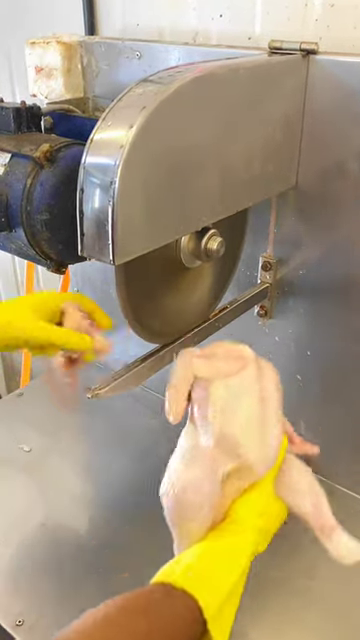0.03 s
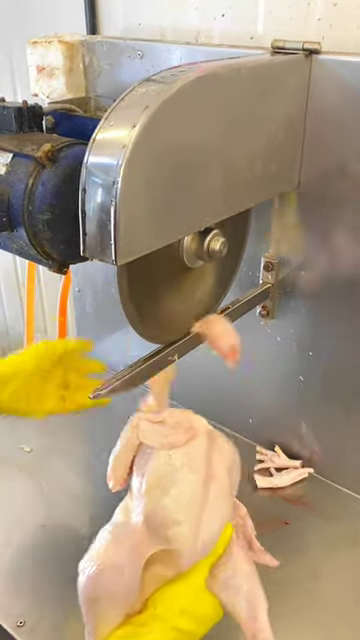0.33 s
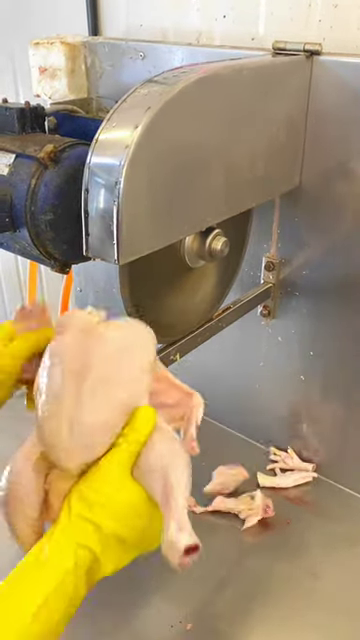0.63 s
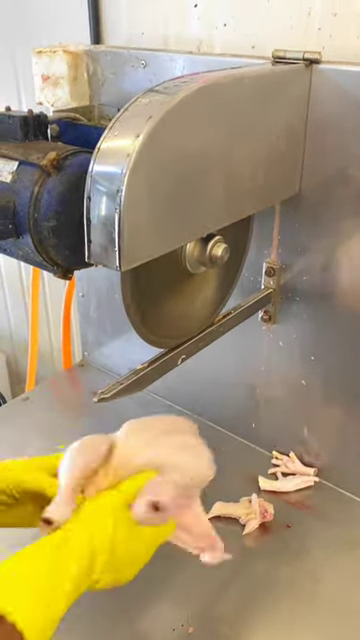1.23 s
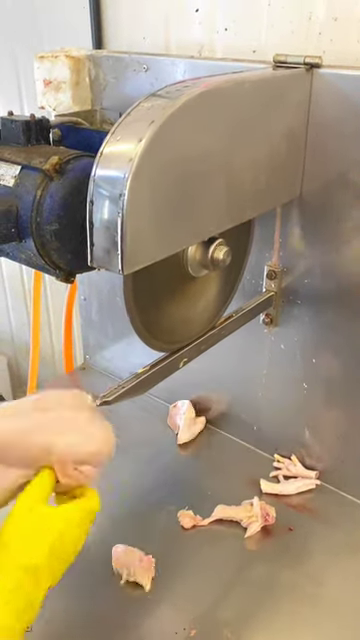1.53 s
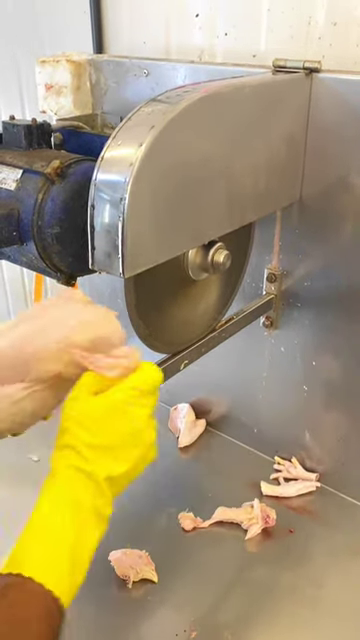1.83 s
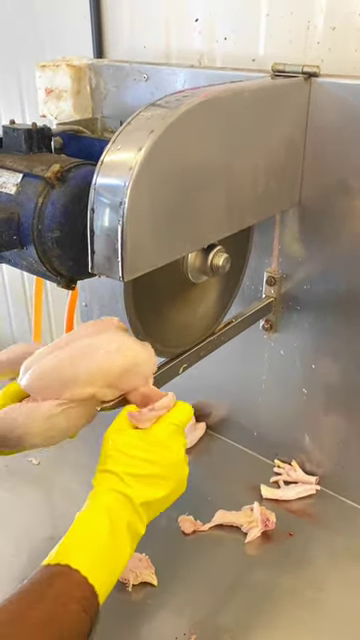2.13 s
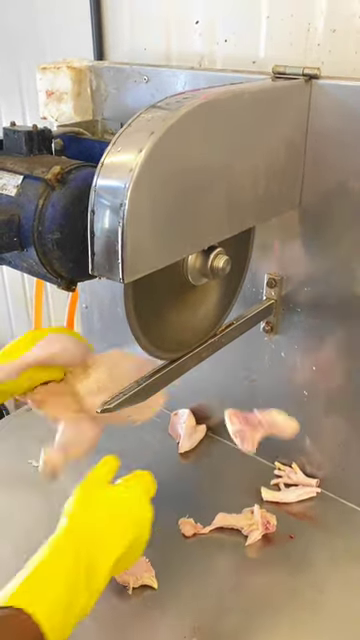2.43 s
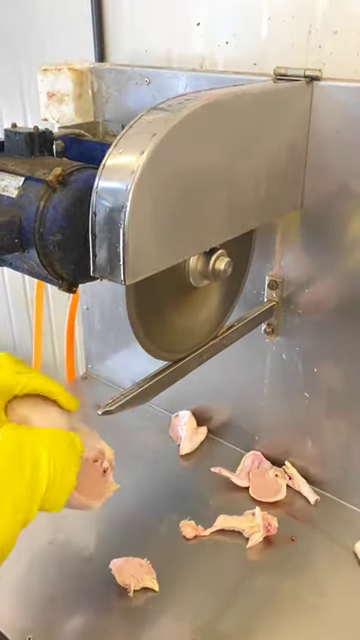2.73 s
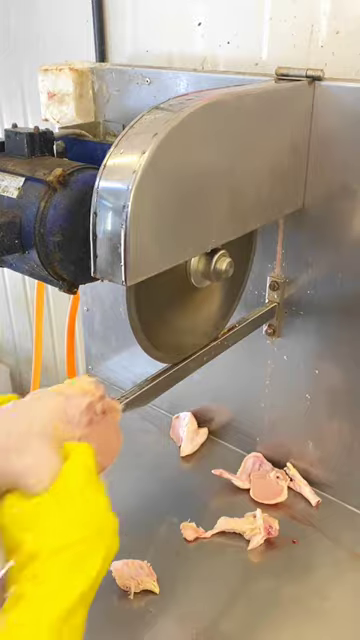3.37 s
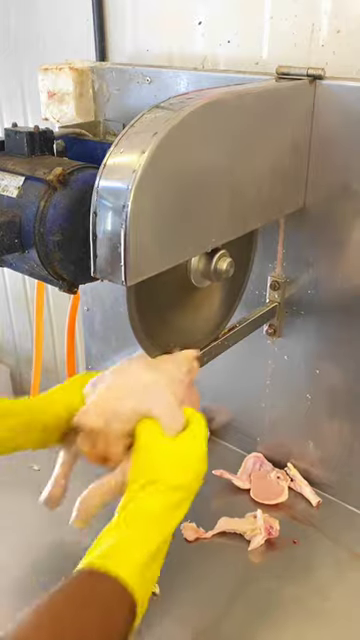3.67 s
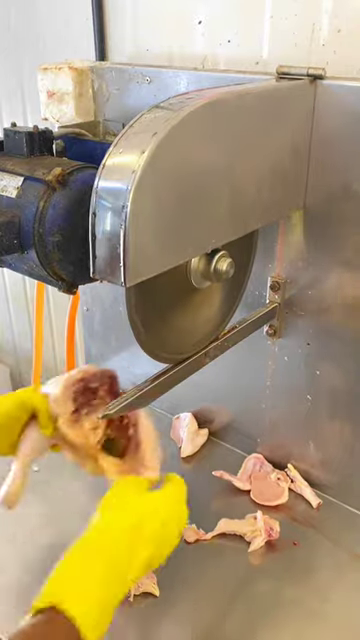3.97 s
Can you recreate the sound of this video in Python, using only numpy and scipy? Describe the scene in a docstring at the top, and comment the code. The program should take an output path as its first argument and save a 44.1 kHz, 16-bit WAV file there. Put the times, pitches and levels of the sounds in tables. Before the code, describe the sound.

A circular blade runs close by in a small hard room, its motor humming and steel guard rattling throughout. It hisses through chicken and rasps, crunches and rings on bone at about 0.3, 1 and 2.2 seconds, then three times between 3.5 and 3.8, groaning faintly after each cut. Meat slaps onto a booming metal table around 0.3 to 0.7, 1.3, 2.5 to 2.7 and 4 seconds.

```python
"""A small hard room, about a metre from a circular blade running in a steel guard over a sheet-metal table.
The motor hums, the guard rattles, the frame rumbles, bearings and cooling air rush.
Poultry is pushed into the blade, which hisses through flesh and rasps, crunches and rings on bone.
After each bone cut the machine runs briefly quieter and the motor groans faintly.
Pieces of meat slap on the table and set it booming."""
import sys
import numpy as np
from scipy import signal
from scipy.fft import rfft, irfft
from scipy.io import wavfile
from scipy.ndimage import uniform_filter1d

SR = 44100
rng = np.random.default_rng(int(sys.argv[2]) if len(sys.argv) > 2 else 0)


def wav_out(sig):
    """Save sig, one row per channel (or a flat mono array), as 16-bit PCM at SR to the path in sys.argv[1]."""
    wavfile.write(sys.argv[1], SR, np.round(np.clip(np.atleast_2d(sig).T, -1, 1) * 32767).astype(np.int16))


N = 176400
TIME_S = np.arange(N) / SR
FREQ_HZ = np.arange(N // 2 + 1) * SR / N
LN_1000 = np.log(1000)  # 60 dB of decay


def undb(db):
    """Decibels to gain."""
    return 10 ** (np.asarray(db) / 20)


def unit(x):
    """Scale to rms 1."""
    return x / np.sqrt(np.mean(x ** 2))


def bell(offset, width):
    """Gaussian bump, peak 1."""
    return np.exp(-(offset / width) ** 2)


def colour(x, curve):
    """Filter by a curve of freq_hz, gain_db points."""
    freq_hz, gain_db = np.array(curve, float).T
    gain = undb(np.interp(np.log(np.maximum(FREQ_HZ, 1)), np.log(freq_hz), gain_db))
    return irfft(rfft(x) * gain, N)


def noise():
    """Two independent white noises."""
    return rng.standard_normal((2, N))


def walk(rate_hz):
    """Smooth random wander, rms 1."""
    size = max(int(SR / rate_hz), 2)
    steps = rng.standard_normal(2048)[np.arange(N) // size % 2048]
    return unit(uniform_filter1d(uniform_filter1d(steps, size), size))


def clicks(per_s, spread_db):
    """Random clicks of uneven size on two paths, rms 1."""
    size = undb(spread_db * np.minimum(rng.exponential(size=N), 5))
    return unit((rng.random(N) < per_s / SR) * size * noise())


def ring(x, pitch_hz, t60_s):
    """One decaying mode; keeps the power of white noise."""
    radius = np.exp(-LN_1000 / (t60_s * SR))
    pole = radius * np.exp(2j * np.pi * pitch_hz / SR)
    return signal.lfilter([np.sqrt(2 * (1 - radius ** 2))], [1, -pole], x).imag


def swell(start_s, attack_s, hold_s, release_s):
    """Exponential rise to 1 at start_s, hold, exponential fall."""
    age_s = TIME_S - start_s
    log_gain = np.minimum(age_s, 0) / attack_s - np.maximum(age_s - hold_s, 0) / release_s
    return np.exp(np.maximum(log_gain, -30))


def reflect(x, envelope, level_db):
    """Add dense echoes that follow an envelope."""
    echoes = rng.standard_normal((2, len(envelope))) * envelope
    echoes /= np.sqrt(np.sum(echoes ** 2) / 2)
    return x + undb(level_db) * signal.fftconvolve(x, echoes, axes=1)[:, :N]


# Stereo width: freq_hz, side_gain_db
STEREO_WIDTH = [(60, -46), (200, -21), (380, -14.5), (700, -1.5), (1300, -4), (2400, -0.5), (4400, 0),
                (8000, 1)]
def spread(pair):
    """Mid and side to stereo at rms 1: narrow bass, wide treble."""
    side = colour(pair[1], STEREO_WIDTH)
    return unit(np.array([pair[0] + side, pair[0] - side]))


WAVER_DB, WAVER_RATE_HZ, DRIFT_HZ = 4.6, 20, 3
# Motor and frame tones: pitch_hz, level_db
HUM_TONES = [(98, -37.5), (199.5, -37.5), (258.5, -35.5), (400.5, -46), (506.5, -49.5), (602, -62),
             (850.5, -51), (1319.5, -51.5), (1779, -49.5)]
def motor_hum():
    """Motor and frame hum, each tone wavering in pitch and level."""
    tones = 0
    for pitch_hz, level_db in HUM_TONES:
        cycles = np.cumsum(pitch_hz + DRIFT_HZ * walk(8)) / SR + rng.random((2, 1))
        gain = np.sqrt(2) * undb(level_db + WAVER_DB * walk(WAVER_RATE_HZ))
        tones += gain * np.sin(2 * np.pi * cycles)
    return spread(tones) * np.std(tones[0])


# Guard resonances: pitch_hz, bandwidth_hz, level_db
GUARD_MODES = [(848, 10, -58), (1377, 24, -42), (1562, 35, -40), (1722, 26, -49.5), (1790, 38, -39),
               (1872, 35, -43.5), (2816, 33, -50.5), (4240, 60, -47.5), (4730, 130, -57), (8920, 440, -55)]
def guard_rattle(trim_db=-2, flutter_db=-1.5):
    """Rapid knocks ring the steel guard."""
    knocks = clicks(per_s=900, spread_db=-4) * undb(flutter_db * walk(23.59))
    modes = 0
    for pitch_hz, bandwidth_hz, level_db in GUARD_MODES:
        t60_s = LN_1000 / (np.pi * bandwidth_hz)
        modes += undb(level_db) * unit(ring(knocks, pitch_hz, t60_s))
    return spread(modes) * np.std(modes) * undb(trim_db)


# Rumble spectrum: freq_hz, gain_db
RUMBLE_CURVE = [(20, -25), (34, -7), (48, 11), (62, 11.5), (78, -1), (105, 8.5), (135, 1.5), (215, 4),
                (290, 2.5), (350, -5.5), (430, -1), (650, -18), (1100, -65)]
def frame_rumble(level_db=-32.5, flutter_db=1.2):
    """The frame shakes with low, fluttering noise."""
    return spread(colour(noise(), RUMBLE_CURVE)) * undb(level_db + flutter_db * walk(16))


# Air spectrum: freq_hz, gain_db
AIR_CURVE = [(200, 13.5), (700, 5.5), (1100, -1), (1800, 6.5), (2300, 4.5), (3000, 4.5), (3800, -0.5),
             (4700, 4.5), (5300, -3.5), (6500, -9), (9000, -16), (11500, -14.5), (15500, -31.5)]
def air_rush(level_db=-37, flutter_db=1.47):
    """Bearings and cooling air give a broad rush."""
    return spread(colour(noise(), AIR_CURVE)) * undb(level_db + flutter_db * walk(31.99))


# Table-top modes: pitch_hz, t60_s, gain_db
TABLE_MODES = [(179.2, 0.26, -13), (220.2, 0.21, -3), (249.4, 0.31, -13), (287, 0.19, -3),
               (325.4, 0.3, -16.5), (398, .18, -9.5)]
def table_boom(age_s, contact_s, spot_hz, spot_db=5, spot_width_hz=30):
    """The struck table's modes hold during contact, then decay; the spot hit favours some."""
    boom = 0
    for pitch_hz, t60_s, gain_db in TABLE_MODES:
        gain = undb(gain_db + spot_db * bell(pitch_hz - spot_hz, spot_width_hz))
        fade = np.exp(-LN_1000 * np.maximum(age_s - contact_s, 0) / t60_s)
        boom += gain * fade * np.sin(2 * np.pi * (pitch_hz * age_s + rng.random()))
    return boom


# Hard smack, soft slap and wet splat spectra: freq_hz, gain_db
SMACK_CURVE = [(250, -20), (450, -12.5), (800, 8.5), (1100, -10.5), (1900, -14), (3000, -8), (6000, -17),
               (12000, -50)]
SLAP_CURVE = [(35, -30), (80, 2), (130, 8), (220, 8.5), (330, 3.5), (500, -1), (800, -13), (1900, -11),
              (6000, -39)]
SPLAT_CURVE = [(1000, 12), (3000, 0.5), (5500, 7), (7500, -11), (10000, 1.5), (15000, -15)]
def meat_contact(slap_gain, splat_gain, smack_db=6.5):
    """Soft, wet meat slaps and splats; the smack grows with the square of the slap."""
    smack = undb(smack_db) * slap_gain ** 2 * spread(colour(noise(), SMACK_CURVE))
    slap = slap_gain * spread(colour(noise(), SLAP_CURVE))
    splat = splat_gain * spread(colour(clicks(per_s=2900, spread_db=1), SPLAT_CURVE))
    return smack + slap + splat


# Meat landings: start_s, attack_s, contact_s, boom_db, drum_db, slap_db, splat_db, spot_hz
MEAT_LANDINGS = [(0.272, 0.0089, 0.03, -26.5, -43, -40, -49, 241),
                 (0.496, 0.0047, 0.016, -26, -18, -42, -63, 181),
                 (0.544, 0.0045, 0.058, -20.5, -23, -25.5, -30.5, 177),
                 (0.669, 0.0023, 0.0063, -21.5, -21, -42, -60, 224),
                 (1.2825, 0.0051, 0.021, -24, -64, -27, -26.5, 288),
                 (2.526, 0.0029, 0.025, -27, -23, -17.5, -26, 220),
                 (2.554, 0.0013, 0.0052, -11.5, -49, -49, -58, 219),
                 (2.651, 0.0065, 0.011, -25, -35, -44, -70, 220),
                 (2.697, 0.003, 0.012, -50, -27.5, -35, -70, 181),
                 (3.969, 0.0055, 0.028, -26, -47, -27, -40, 213)]
def landings(drum_hz=107.6, drum_t60_s=0.6):
    """Each piece slaps the table, rings its modes and flexes the sheet like a drum."""
    boom = drum_gain = slap_gain = splat_gain = 0
    for start_s, attack_s, contact_s, boom_db, drum_db, slap_db, splat_db, spot_hz in MEAT_LANDINGS:
        age_s = np.maximum(TIME_S - start_s, 0)
        pressed = 1 - np.exp(-age_s / attack_s)
        boom += undb(boom_db) * pressed * table_boom(age_s, contact_s, spot_hz)
        drum_gain += undb(drum_db) * pressed * swell(start_s, attack_s, contact_s, drum_t60_s / LN_1000)
        slap_gain += undb(slap_db) * pressed * swell(start_s, attack_s, contact_s, contact_s)
        splat_gain += undb(splat_db) * swell(start_s, attack_s=0.002, hold_s=0, release_s=0.009)
    drum = drum_gain * np.sin(2 * np.pi * drum_hz * TIME_S)
    return boom + drum + room(meat_contact(slap_gain, splat_gain), level_db=-11)


# Flesh cuts: start_s, hold_s, level_db
FLESH_CUTS = [(0.277, 0.12, -35), (.94, 0.12, -38), (2.143, 0.058, -41), (2.197, 0.12, -36),
              (3.453, 0.013, -45), (3.516, 0.057, -27.5), (3.661, 0.11, -28.5)]
def flesh_envelope(attack_s=0.0026, release_s=0.0082):
    """Gain of the hiss as the edge passes through flesh."""
    return sum(undb(level_db) * swell(start_s, attack_s, hold_s, release_s)
               for start_s, hold_s, level_db in FLESH_CUTS)


# Rasp spectrum: freq_hz, gain_db
RASP_CURVE = [(150, 4), (900, -24), (1800, -12), (2700, -8), (3600, -10), (4500, 1), (5600, 3.5), (6900, 3),
              (8400, 5), (10500, 3.5), (12500, 1), (13700, 0), (15200, -8)]
def edge_rasp(chips, bounce_s=0.013, bounce_db=3.5):
    """Fine chips rasp, made tinny by quick reflections between guard and table."""
    echo_decay = np.exp(-TIME_S[:SR // 20] / bounce_s)
    return unit(reflect(colour(chips, RASP_CURVE), echo_decay, bounce_db))


def room(x, level_db, t60_s=0.46, delay_s=0.0096):
    """Hard walls add a short tail."""
    age_s = TIME_S[:SR]
    return reflect(x, np.exp(-LN_1000 * age_s / t60_s) * (age_s > delay_s), level_db)


# Bone cuts: bite_s, attack_s, hold_s, release_s, rasp_db, crunch_db, ring_db, mode_a_hz, mode_b_hz
BONE_CUTS = [(0.339, 0.01, 0.0047, 0.011, -19.5, -24.5, -26, 3331, 5490),
             (0.964, 0.012, 0.016, 0.0087, -18.5, -25, -26, 1548, 6640),
             (2.216, 0.0056, 0.017, 0.0096, -15.5, -19.5, -29, 5400, 7915),
             (3.526, 0.0092, 0.021, 0.035, -29, -27, -24.5, 2656, 1548),
             (3.634, 0.0043, 0.021, 0.013, -17, -40, -27.5, 8345, 1548),
             (3.757, 0.009, 0.004, 0.014, -21, -27, -29.5, 4582, 1940)]
def bone_envelopes():
    """Gains of rasp and crunch as the edge bites bone."""
    bites = np.array([swell(*cut[:4]) for cut in BONE_CUTS])
    rasp_db, crunch_db = np.array(BONE_CUTS).T[4:6]
    return undb(rasp_db) @ bites, undb(crunch_db) @ bites


# Crunch spectrum: freq_hz, gain_db
CRUNCH_CURVE = [(150, -23), (600, 8), (1150, -10), (1500, 11), (1950, 15.5), (2300, -12.5), (2750, 2),
                (3600, 29.5), (4500, 6), (5300, -35.5), (7000, -25), (12000, -38)]
def bone_crunch():
    """Bone splits into coarse splinters."""
    return unit(colour(clicks(per_s=2500, spread_db=2.5), CRUNCH_CURVE))


# Disc modes: pitch_hz, t60_s, gain_db
BLADE_MODES = [(1548, .16, -4), (1940, .12, -8), (2656, .14, -1), (3331, .14, -6), (4318, .17, 1),
               (4582, .33, -3), (5005, .15, -8), (5490, .13, 2), (5738, .11, -1), (5936, .1, -3),
               (6640, .09, 1), (6990, .08, 1), (7510, .08, -1), (7915, .09, 0), (8345, .1, -2),
               (9025, .2, -5), (9715, .13, -5), (10150, .11, -5), (11300, .12, -5)]
def blade_ring(chips, ring_s=0.6, waver_db=2, favour_db=6, favour_width_hz=170):
    """Bites ring the disc, wavering as it turns; where bone meets the rim favours two modes."""
    out = np.zeros((2, N))
    wavers = [undb(waver_db * walk(45)) for _ in BLADE_MODES]
    for bite_s, attack_s, hold_s, release_s, _, _, ring_db, *favoured_hz in BONE_CUTS:
        span = slice(max(int((bite_s - 0.05) * SR), 0), int((bite_s + ring_s) * SR))
        push = (chips * swell(bite_s, attack_s, hold_s, release_s))[:, span]
        for (pitch_hz, t60_s, gain_db), waver in zip(BLADE_MODES, wavers):
            favour = sum(bell(pitch_hz - hz, favour_width_hz) for hz in favoured_hz)
            tone = ring(push, pitch_hz, t60_s)
            tone /= np.abs(tone).max(axis=1, keepdims=True)
            out[:, span] += undb(ring_db + gain_db + favour_db * favour) * waver[span] * tone
    return out


def widen(near, stray, treble_lag_s=0.0002, corner_hz=3400, stray_db=-10):
    """Treble reaches the right side later; stray paths add width."""
    lag_s = treble_lag_s * (1 - np.exp(-(FREQ_HZ / corner_hz) ** 4))
    late = irfft(rfft(near) * np.exp(-2j * np.pi * FREQ_HZ * lag_s), N)
    return np.array([near, late]) + undb(stray_db) * np.array([stray, -stray])


def cutting(flutter_db=1.2):
    """One stream of chips drives rasp and disc; splinters crunch on top."""
    chips = clicks(per_s=14000, spread_db=1.3) * undb(flutter_db * walk(300))
    rasp_gain, crunch_gain = bone_envelopes()
    rasp = edge_rasp(chips) * (flesh_envelope() + rasp_gain)
    crunch = bone_crunch() * crunch_gain
    near, stray = rasp + crunch + blade_ring(chips)
    return widen(near, stray)


def after_bites(lag_s, width_s):
    """A smooth bump lag_s after each bone bite."""
    return sum(bell(TIME_S - cut[0] - lag_s, width_s) for cut in BONE_CUTS)


def motor_groan(pitch_hz=508, level_db=-40):
    """The motor sings as it works to regain speed after each bone cut."""
    load = np.tanh(after_bites(lag_s=0.06, width_s=0.07))
    gain = load * undb(level_db + WAVER_DB * walk(WAVER_RATE_HZ))
    cycles = np.cumsum(pitch_hz + DRIFT_HZ * walk(20)) / SR
    return gain * np.sin(2 * np.pi * cycles)


def meat_damping(depth_db=5):
    """Meat pressed on the blade steadies it: a dip in gain after each bone bite."""
    calm = np.tanh(2 * after_bites(lag_s=0.13, width_s=0.06))
    return undb(-depth_db * calm)


def scene(right_bias_db=0.5):
    """Running machine, cuts and landings, leaning slightly right."""
    vibration = motor_hum() + guard_rattle() + frame_rumble()
    machine = vibration * meat_damping() + air_rush() + motor_groan()
    cuts = room(cutting(), level_db=-14)
    balance = undb([[-right_bias_db / 2], [right_bias_db / 2]])
    return (machine + cuts + landings()) * balance


def record(dry):
    """Round the highest peaks and cut the top treble."""
    peak_limit, cutoff_hz = 0.8, 15550
    rounded = dry / (1 + (dry / peak_limit) ** 4) ** 0.25
    return signal.sosfilt(signal.ellip(10, 0.2, 80, cutoff_hz, fs=SR, output="sos"), rounded)


dry = scene()
out = record(dry)
wav_out(out)
```